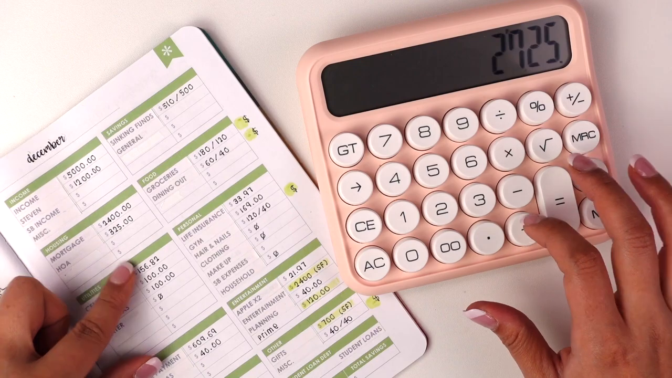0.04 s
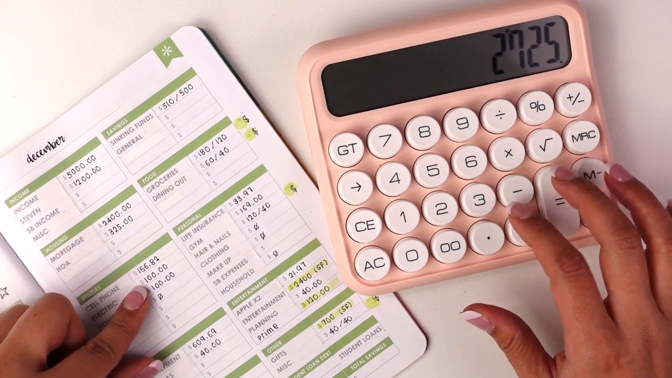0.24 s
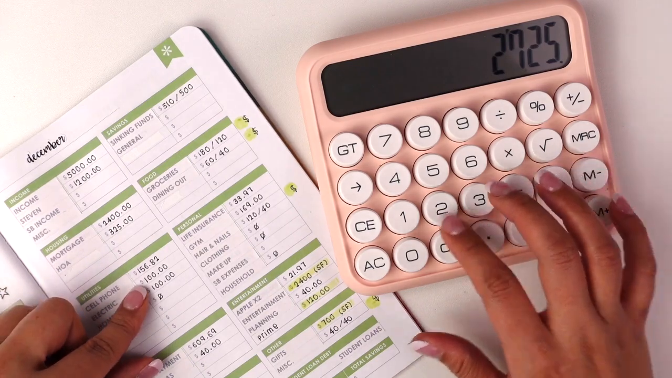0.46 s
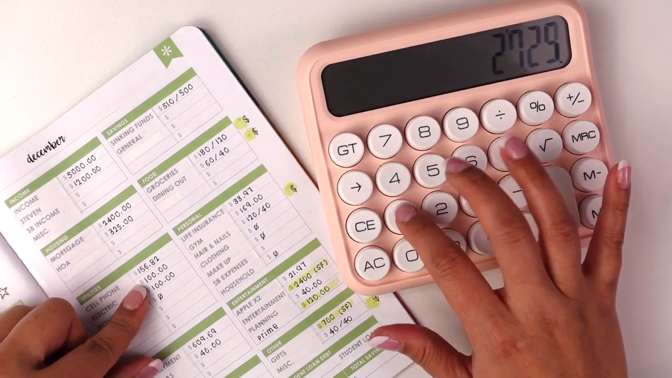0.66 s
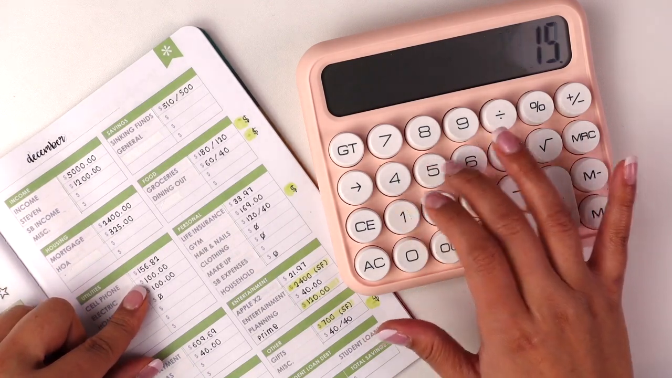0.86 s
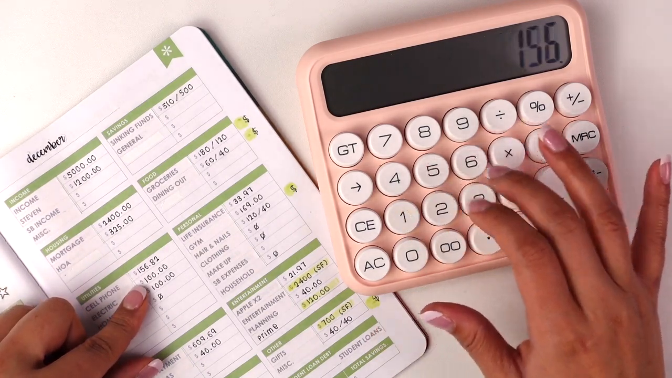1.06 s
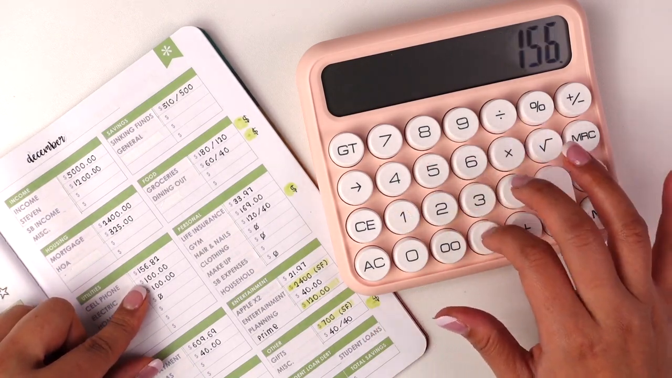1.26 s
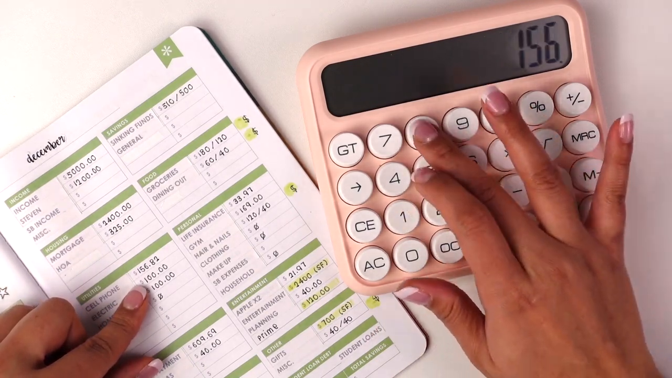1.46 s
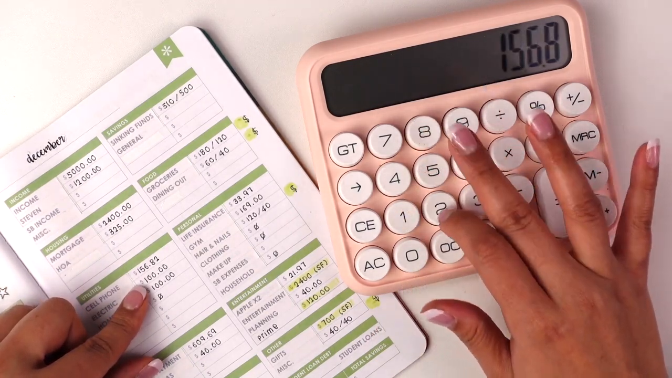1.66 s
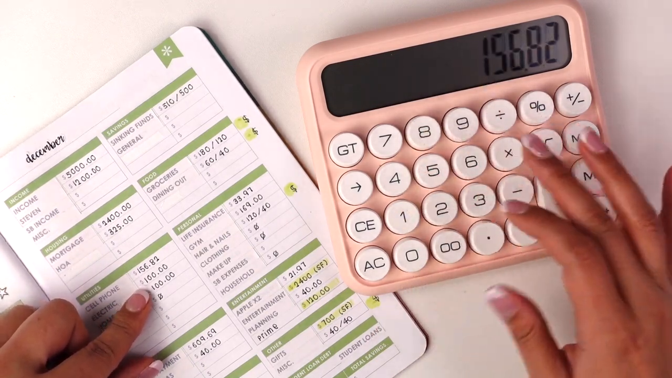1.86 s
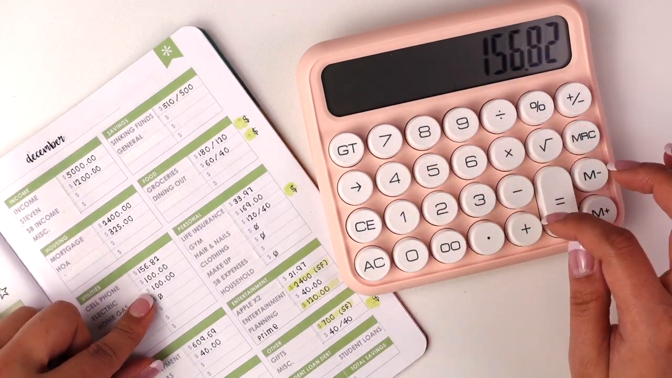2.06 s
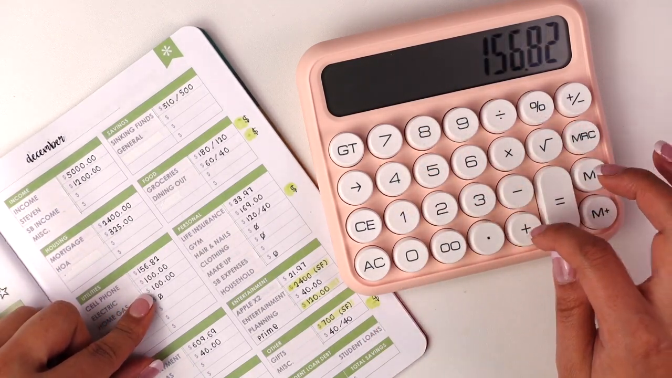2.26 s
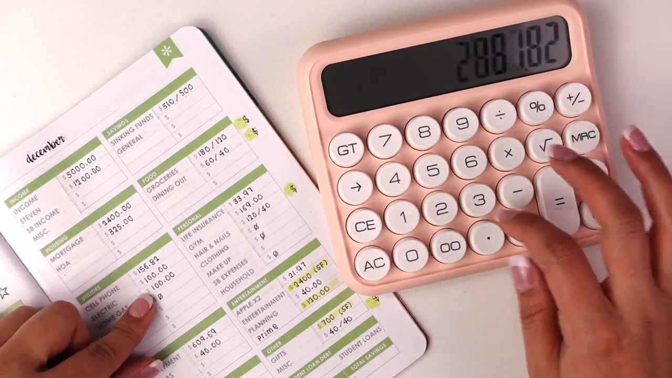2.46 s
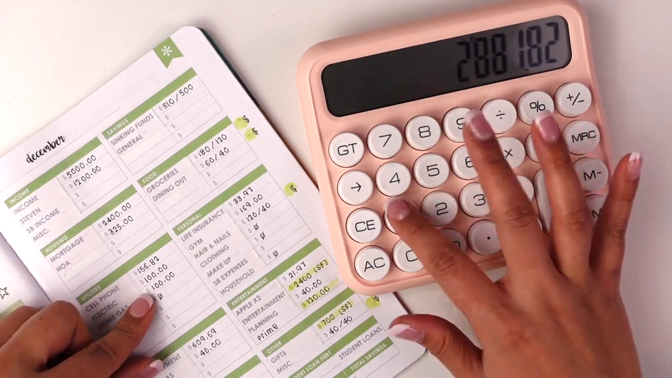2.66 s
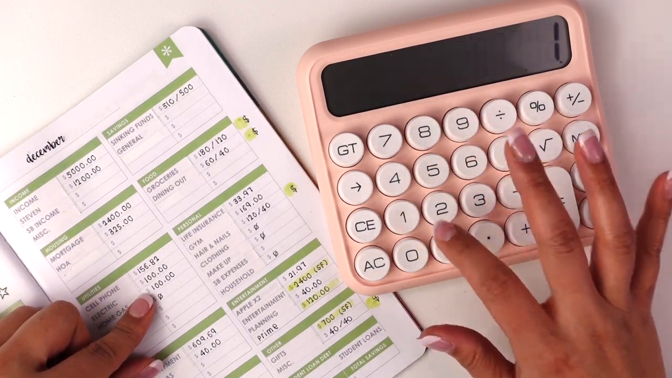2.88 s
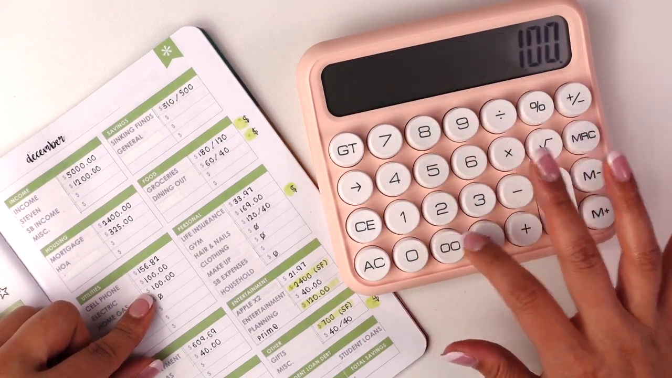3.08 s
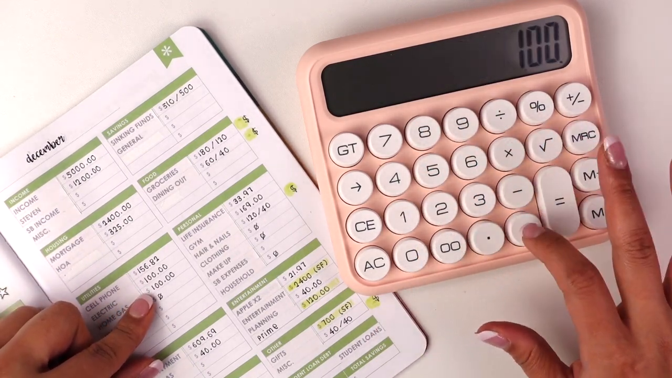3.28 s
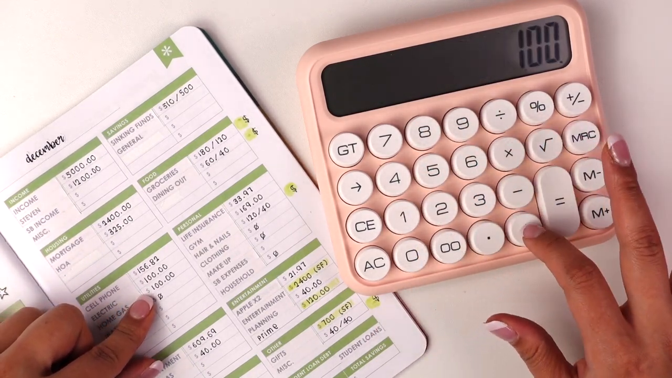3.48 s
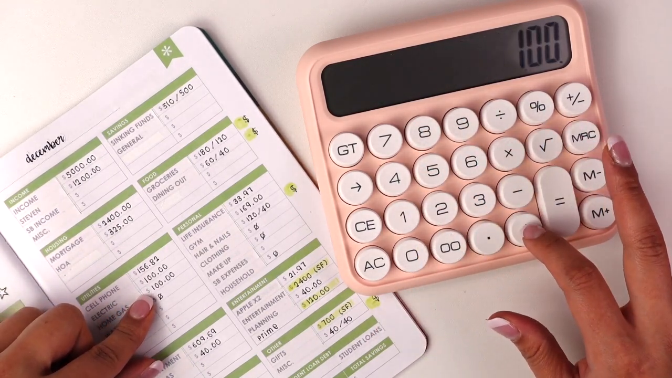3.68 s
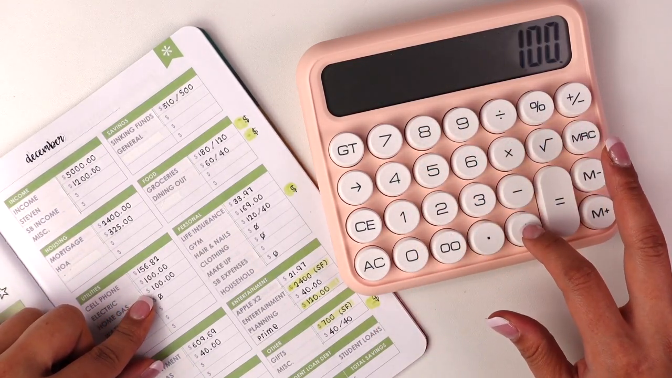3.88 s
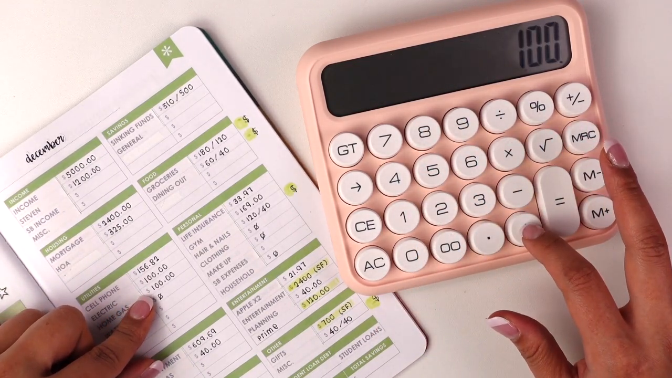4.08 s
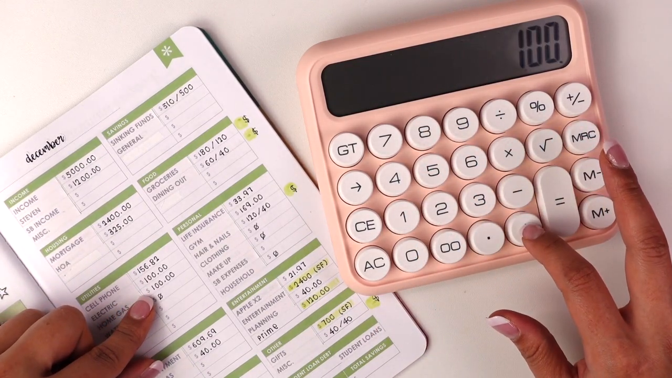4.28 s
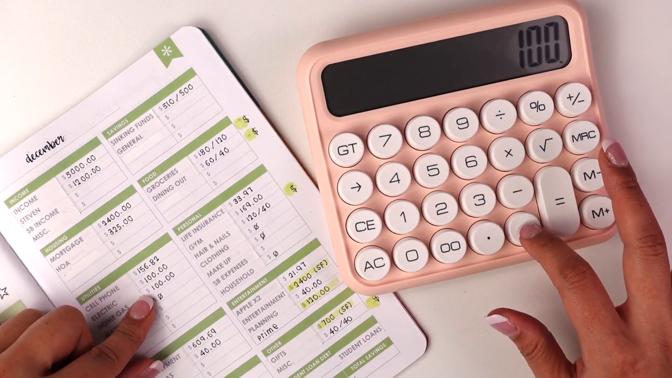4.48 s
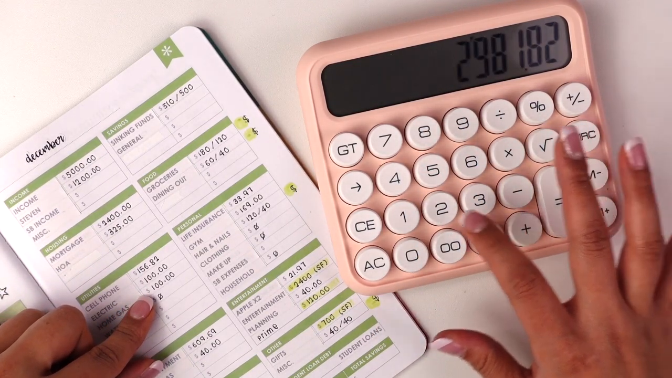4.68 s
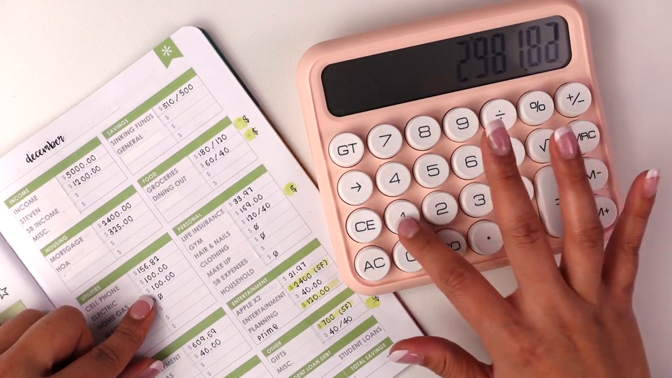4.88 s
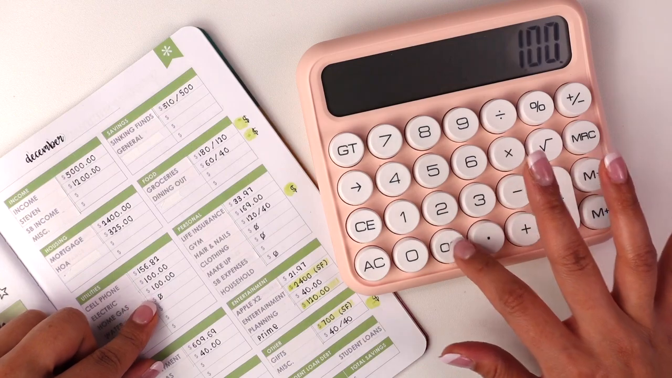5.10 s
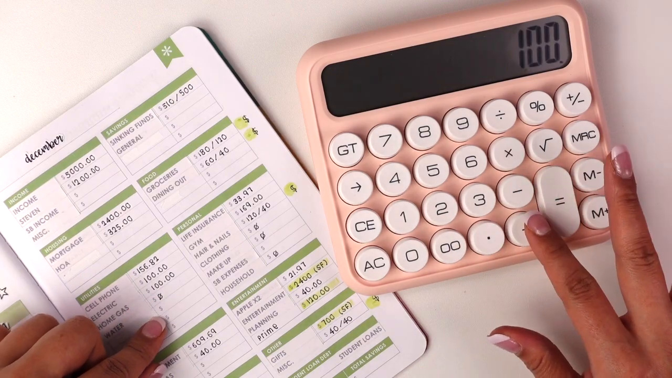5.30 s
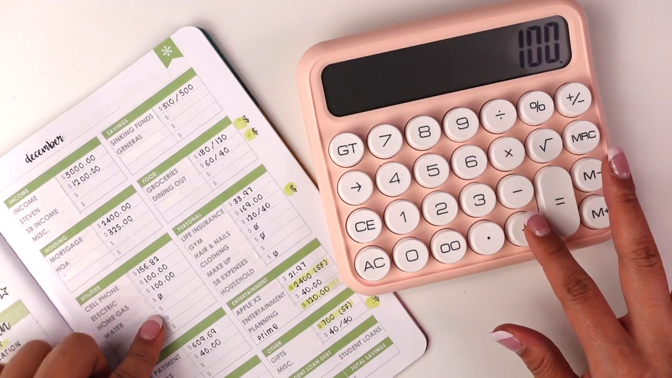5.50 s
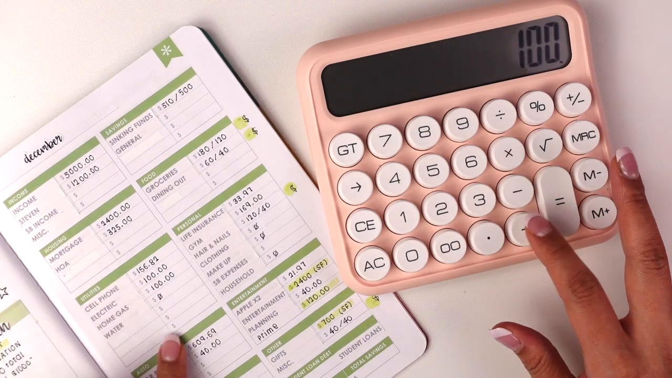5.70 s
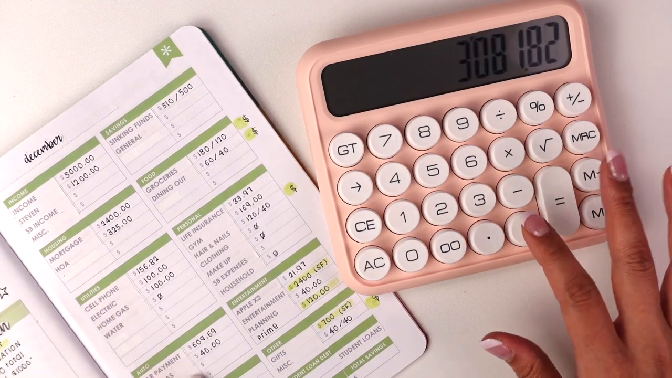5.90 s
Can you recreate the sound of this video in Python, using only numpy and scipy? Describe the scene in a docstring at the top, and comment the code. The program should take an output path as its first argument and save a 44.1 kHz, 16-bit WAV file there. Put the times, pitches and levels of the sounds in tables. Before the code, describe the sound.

A close, nearly mono microphone picks up a plastic calculator being used on a table in a small, quiet room with steady, faint air noise. A key springs back with a bright clack at once, while a hand slides softly on paper until about 0.4 s. From 0.6 to 1.8 s keys come in a quick uneven run: crisp nail ticks, rounder finger-pad clicks, dull low thuds, and louder chattery releases near 1.1, 1.3 and 1.8 s. A press at 2.35 is released at 2.5; another flurry runs from 2.7 to 3.1 s, with a very faint click at 3.4. A pause of about a second follows. Tapping resumes at 4.5 s, with clacks near 4.65 and 5.2 and fast presses between. From 5.4 s the hand rubs the page with small snags, growing louder, before a soft press at 5.8 and a final sharp clack at 5.9 s.

```python
"""Fingers enter sums on a plastic desk calculator on a table in a small, quiet room.
Each key contact mixes a tick, cap chatter, buzz and a ringing case; springing back gives a louder clack.
Pressed keys bottom out with a soft thud: a dull case knock over a rocking table top.
Short noise scuffs give brushes on the keys, a bounce click and a faint swell before each release; the other
hand slides over paper (uneven noise, a few snags) at the start and near the end; room air is steady noise."""
import sys
import numpy as np
from scipy import signal
from scipy.fft import rfft, irfft, next_fast_len
from scipy.io import wavfile
from scipy.ndimage import uniform_filter1d

SR = 44100
rng = np.random.default_rng(int(sys.argv[2]) if len(sys.argv) > 2 else 0)


def wav_out(sig):
    """Save sig, one row per channel (or a flat mono array), as 16-bit PCM at SR to the path in sys.argv[1]."""
    wavfile.write(sys.argv[1], SR, np.round(np.clip(np.atleast_2d(sig).T, -1, 1) * 32767).astype(np.int16))


N = 262306

# keys springing back against their stops: [t/s, click level/dB before gain_db,
# case knock level/dB re click, edge level/dB re click, chatter/s before span]
RELEASE_EVENTS = [(0.0443, -22.5, -24, -12.5, .003), (1.072, -22.3, -14, -14.5, .0018),
                  (1.3359, -24, -15.5, -13.5, .003), (1.8014, -25, -14, -9, .0038),
                  (2.4664, -24.7, -25, -11.5, .0034), (3.0988, -21.8, -22.5, -11.5, .0043),
                  (3.4234, -42.5, -14, -13.5, .0054), (4.6522, -26, -22, -15, .0028),
                  (5.1698, -22.5, -21.5, -11, .0052), (5.899, -21.5, -23.5, -12, .0016)]
# release contact colour: [f/Hz, level/dB relative]
RELEASE_SPECTRUM = [(150, -41), (350, -38), (750, -27.5), (1000, -5), (1450, -7.5), (2100, -6),
                    (2700, -1.5), (3800, -5.5), (5200, -8), (7000, -15.5), (10000, -25.5), (12300, -28.5),
                    (15500, -39.5)]


def releases():
    """The freed cap flies up and chatters against its stop."""
    return keys(RELEASE_EVENTS, RELEASE_SPECTRUM, cap_hz=2780, cap_width=.08, cap_db=3.5, gain_db=0.74,
                tick_db=-9, rebound_db=1.5, rise=.5, span=1.294, buzz_db=-10, buzz_t60_s=0.11,
                ring_db=-12, wet_db=-12.5, early_db=-14.5)


# keys struck by a fingernail: [t/s, click level/dB before gain_db, case knock level/dB re click,
# edge level/dB re click, chatter/s before span, thud level/dB, bottoming knock level/dB before doubling]
NAIL_EVENTS = [(0.6349, -38.5, -16, 1, .0036, -47.5, -43.5), (0.8008, -31, -10, 1.8, .001, -46, -41.5),
               (0.9894, -28.5, -9.5, -3, .0007, -48, -40), (1.2305, -30, -14, -5, .0022, -50, -50),
               (1.7008, -32, -8, .6, .0041, -49, -55), (2.3533, -36.5, -13.5, -6.3, .0021, -51, -53),
               (2.9968, -29.5, -11.4, 0, .0048, -42, -46.5), (4.87, -43.5, -4.5, -2, .0018, -45, -55),
               (5.0599, -29.5, -17, -.7, .0013, -42.5, -50.5)]
# nail contact colour: [f/Hz, level/dB relative]
NAIL_SPECTRUM = [(150, -37), (350, -19.5), (800, -12.5), (1400, -5.5), (2000, -8), (2800, -3.5),
                 (4800, -3.5), (6000, 0), (7500, -2.5), (8800, -7.5), (12300, -11), (15500, -27.5)]


def nail_taps():
    """A hard nail gives a sharp tick and little chatter."""
    return keys(NAIL_EVENTS, NAIL_SPECTRUM, cap_hz=5900, cap_width=.07, cap_db=6, gain_db=-1.28,
                tick_db=6, rebound_db=-2.5, rise=0.53, span=0.78, buzz_db=3, buzz_t60_s=.026,
                ring_db=-14, wet_db=-13.0, early_db=-15)


# keys pushed home by a finger pad: columns as NAIL_EVENTS
# [t/s, click level/dB, case knock level/dB, edge level/dB, chatter/s, thud level/dB, bottoming knock level/dB]
PAD_EVENTS = [(0.7464, -30, -12.5, -7.5, .0054, -60, -60), (0.8945, -23.5, -9, -10, .0035, -60, -60),
              (1.4995, -36, -12, -6.2, .0073, -50.5, -49.5), (1.5787, -26.5, -1.7, -11.5, .0026, -58, -54),
              (2.7229, -41.5, -11.5, -9, .0056, -54.5, -57.5), (2.8181, -25.5, -11, -4.5, .004, -53.5, -60),
              (4.528, -46, -1.5, -17, .0043, -60, -60), (4.9475, -27, -8, -10, .0027, -58, -58),
              (5.781, -43.5, -12, -13, .015, -50, -49)]
# pad contact colour: [f/Hz, level/dB relative]
PAD_SPECTRUM = [(150, -37), (350, -29), (750, -10), (1150, -2), (1750, -10), (2200, -4.5), (2550, -0.5),
                (4000, -6), (5500, -6), (7000, -14), (10500, -23), (15500, -38)]


def pad_presses():
    """A soft finger drives the key home and rings the case."""
    return keys(PAD_EVENTS, PAD_SPECTRUM, cap_hz=3150, cap_width=.15, cap_db=4, gain_db=-0.62,
                tick_db=-18.5, rebound_db=-4, rise=0.75, span=1.05, buzz_db=-16.5, buzz_t60_s=0.15,
                ring_db=-7, wet_db=-14.5, early_db=-12.5)


def keys(events, colour, cap_hz, cap_width, cap_db, gain_db, tick_db, rebound_db, rise, span,
         buzz_db, buzz_t60_s, ring_db, wet_db, early_db, size=8192):
    """Each contact: a tick and its rebound, the cap chattering in its guide, buzzing caps, the ringing case."""
    out, t = np.zeros((2, N)), np.arange(size) / SR
    tick = unit(1. * (t == 0))
    for s, click_db, knock_db, edge_db, chatter_s, *_ in events:
        u = t / (span * chatter_s)
        rebound_s = .0011 * np.exp(0.19 * rng.standard_normal())
        rebound = np.roll(tick, round(SR * rebound_s))
        chatter = unit(rng.standard_normal(size) * (1 - np.exp(-u / rise)) * np.exp(-u ** 3))
        buzz = unit(rng.standard_normal(size) * (1 - np.exp(-u)) * amp(-60 * t / buzz_t60_s))
        ring = amp(ring_db) * unit(case_ring(t))
        own_hz = cap_hz * np.exp(.02 * rng.standard_normal())  # no two caps are quite alike

        def cap(hz):
            return along(colour, hz) + cap_db / (1 + ((hz / own_hz - 1) / cap_width) ** 2)

        def sound(blow):
            body = unit(coloured(blow, cap)) + ring
            return voiced(body, click_db + gain_db, knock_db, edge_db)

        ticks = amp(tick_db) * (tick - amp(rebound_db) * rebound)
        direct = sound(chatter + ticks + amp(buzz_db) * buzz)
        # the room gathers sound from all directions, so the chatter's spectral notches partly average out
        radiated = sound(tick + .35 * chatter)
        add(out, s, room(direct, radiated, wet_db, early_db))
    return out


def voiced(x, click_db, knock_db, edge_db):
    """Set a blow's level over 20 ms; key place and contact hardness weight its low knock and high edge."""
    power = 2 * abs(rfft(x)) ** 2 / (len(x) * SR * .02)
    hz = np.fft.rfftfreq(len(x), 1 / SR)

    def level_db(lo_hz, hi_hz):
        return 10 * np.log10(power[(hz > lo_hz) & (hz < hi_hz)].sum())

    low_db = knock_db - level_db(350, 1100)
    mid_db = -level_db(1200, 5000)
    high_db = edge_db - level_db(5500, 15000)
    weights = [(900, low_db), (1400, mid_db), (4500, mid_db), (6000, high_db)]
    return coloured(x, lambda f: click_db + along(weights, f))


# mean modes of the hollow case: [f/Hz, level/dB relative, t60/s]
CASE_MODES = [(449, -11.5, 0.087), (525.6, -8.5, 0.049), (615, -22, 0.15), (874.6, 0.5, 0.068),
              (955, -1.5, 0.068), (1166, -13.5, .025), (1435, -7, 0.046), (1840, -4.5, .04),
              (2390, -8.5, 0.099), (2674, -11.5, .05), (2780, -11.5, 0.085), (3364, -5.5, 0.071),
              (3818, -9, 0.063), (4650, -14.5, 0.11), (4873, -19.5, 0.019), (5440, -3.5, .03)]


def case_ring(t):
    """The case rings with mode strengths varied at random from blow to blow."""
    hz, db, t60_s = np.transpose(CASE_MODES)[:, :, None]
    strength, detune, phase = rng.standard_normal((3, len(CASE_MODES), 1))
    db = db + 2 * strength
    hz = hz * (1 + .004 * detune)
    modes = amp(db - 60 * t / t60_s) * np.sin(2 * np.pi * hz * t + np.pi * phase)
    return modes.sum(0) * (1 - np.exp(-t / 0.0018))


# an ordinary push; each dB above it sinks deeper (later thud) and stiffens the rubber feet (higher thud)
USUAL_THUD_DB, TRAVEL_S, THUD_HZ = -48, .0095, 114
SINK_S_PER_DB, STIFFEN_HZ_PER_DB = .0013, 5
LANDING_DB = -54  # the landing finger already jolts the table a little


def thuds(swell_s=0.008, squash_db=-3, landing_s=.004, size=8192):
    """Each key bottoms out on its rubber dome: the case knocks dully, the table top rocks a few cycles."""
    out, t = np.zeros((2, N)), np.arange(size) / SR
    knock_spectrum = [(100, -5), (400, 4.5), (1000, -6), (3000, -6.5), (9000, -22)]
    for s, *_, thud_db, knock_db in NAIL_EVENTS + PAD_EVENTS:
        heavy_db = max(thud_db - USUAL_THUD_DB, 0)
        table = np.sin(2 * np.pi * (THUD_HZ + STIFFEN_HZ_PER_DB * heavy_db) * t)
        squash = unit(rng.standard_normal(size) * swell(t, .004))
        blow = unit(case_ring(t)) + amp(squash_db) * squash
        knock = coloured(blow, lambda hz: along(knock_spectrum, hz))
        rock = amp(thud_db) * swell(t, swell_s) * table
        push = rock + 2 * amp(knock_db) * knock / abs(knock).max()
        add(out, s, amp(LANDING_DB) * swell(t, landing_s) * table)
        bottom_s = s + TRAVEL_S + SINK_S_PER_DB * heavy_db
        add(out, bottom_s, room(push, push, wet_db=-3.5, early_db=-13, wide_db=-3.5))
    # so small a surface radiates little deep bass
    return filtered(out, lambda hz: amp(along([(30, -10), (60, -2), (95, 0)], hz)))


# brushes on the keys, and one short bounce click after the release at 1.072 s:
# [t/s, level/dB, centre f/Hz, swell/s]
SMALL_CONTACTS = [(0.01, -49, 2200, .0065), (0.535, -61, 3330, .04), (1.084, -30, 2700, .0015),
                  (2.709, -51, 3470, .006), (4.388, -56, 2800, .0024), (4.64, -42, 2600, .006),
                  (5.09, -38, 1090, .004), (5.27, -40, 2220, .0022)]
# noise swell before each release click; level re that click before gain_db
PRE_LEAD_S, PRE_DB, PRE_HZ, PRE_SWELL_S = .014, -30, 2800, .007


def small_contacts():
    """Brushes on the caps, one bounce click, and a faint, soft noise swell just before each release click."""
    pre_swells = [(s - PRE_LEAD_S, click_db + PRE_DB, PRE_HZ, PRE_SWELL_S)
                  for s, click_db, *_ in RELEASE_EVENTS]
    return scuffs(SMALL_CONTACTS + pre_swells)


def scuffs(events, size=8192):
    """Short, soft swells of band noise, as of skin and nails grazing plastic or paper."""
    out, t = np.zeros((2, N)), np.arange(size) / SR
    octaves, band_db = [-2, -.4, 0, .4, 1, 2], [-28, -10, 0, -10, -18, -36]
    for s, db, centre_hz, swell_s in events:
        graze = coloured(rng.standard_normal(size),
                         lambda hz: np.interp(np.log2((hz + 1) / centre_hz), octaves, band_db))
        scuff = amp(db) * swell(t, swell_s) * unit(graze)
        add(out, s, room(scuff, scuff, wet_db=-6, early_db=-15.5))
    return out


# the other hand on the page, one curve per slide: [t/s, level/dB before grain and catch]
SLIDE_CURVES = [
    [(0, -60), (0.12, -54), (0.4, -73)],
    [(5.36, -73.5), (5.53, -62.5), (5.64, -56), (5.88, -49), (5.95, -39.5)],
]
# page noise: [f/Hz, level/dB per Hz, relative]
PAPER_SPECTRUM = [(700, -21.5), (1400, -6.5), (1900, -0.5), (2400, -9.5), (3200, -4.5), (4500, -7.5),
                  (6500, -9), (10000, -16), (16000, -26)]


def paper(grain_db=2.1):
    """A finger slides over the page, catching unevenly on its fibres."""
    t = np.arange(N) / SR
    level = sum(amp(np.interp(t, *np.transpose(slide), left=-120, right=-120)) for slide in SLIDE_CURVES)
    grain = unit(uniform_filter1d(rng.standard_normal(N), size=200))
    catch_db = 1.3 * unit(uniform_filter1d(rng.standard_normal(N), size=900))
    return level * amp(grain_db * grain + catch_db) * noise(PAPER_SPECTRUM)


# the sliding skin sticks and slips; spacing and level are means
SNAG_FROM_S, SNAG_EVERY_S, SNAG_DB, SNAG_HZ, SNAG_SWELL_S = 5.465, .065, -53.5, 3000, .005


def snags(count=4):
    """The sliding finger snags on the page at uneven intervals."""
    events = []
    for k, (late, hard) in enumerate(rng.standard_normal((count, 2))):
        s = SNAG_FROM_S + SNAG_EVERY_S * (k + .2 * late)
        events.append((s, SNAG_DB + 2 * hard, SNAG_HZ, SNAG_SWELL_S))
    return scuffs(events)


# room tail decay: [f/Hz, t60/s]
TAIL_T60 = [(150, 1.06), (1000, 0.69), (3000, 0.4544), (6000, 0.5554), (14000, 0.35)]
# room tail colour: [f/Hz, level/dB relative]
TAIL_SPECTRUM = [(150, -4), (700, -0.5), (950, -3.5), (1400, -2), (3000, -3.5), (7000, -4.5), (14000, 1.5)]


def room(direct, radiated, wet_db, early_db, wide_db=-9.5):
    """A close, nearly mono microphone hears the direct sound, near reflections and a diffuse tail."""
    hz, t, z = signal.stft(rng.standard_normal((2, SR // 2)), SR, nperseg=256)
    decay_db = along(TAIL_SPECTRUM, hz)[:, None] - 60 * t / along(TAIL_T60, hz)[:, None]
    tail = signal.istft(z * amp(decay_db), SR, nperseg=256)[1]
    t = np.arange(tail.shape[1]) / SR
    tail = tail * (1 - np.exp(-(t / 0.0039) ** 2))
    early = rng.standard_normal(tail.shape) * np.exp(-((t - .012) / 0.009) ** 2)
    answer = amp(wet_db) * tail / np.linalg.norm(tail[0])
    answer = answer + amp(early_db) * early / np.linalg.norm(early[0])
    mid, side = signal.fftconvolve(radiated[None], answer, axes=1) * amp([[0], [wide_db]])
    add(mid, 0, direct)
    return np.array([mid + side, mid - side])


# room air, mid channel: [f/Hz, level/dB per Hz, relative]
AIR_MID_SPECTRUM = [(22, -44), (38, -21), (50, -24.5), (80, -5), (120, -2.5), (200, 3), (310, -1.5),
                    (500, -5), (700, -5), (850, 2), (1000, -9), (1900, -7.5), (2700, -15), (5000, -20),
                    (9500, -20), (16000, -26.5)]
# room air, side channel: [f/Hz, level/dB per Hz, relative]
AIR_SIDE_SPECTRUM = [(22, -31.5), (50, -20), (120, -18.5), (280, -37), (900, 8.5), (3000, -1),
                     (15000, -39.5)]


def room_air(mid_db=-61.2, side_db=-73):
    """Steady moving air, widest from about 1 to 3 kHz."""
    mid, side = amp(mid_db) * noise(AIR_MID_SPECTRUM), amp(side_db) * noise(AIR_SIDE_SPECTRUM)
    return np.array([mid + side, mid - side])


def amp(db):
    """Decibels to gain."""
    return 10 ** (np.asarray(db) / 20)


def unit(x):
    """x at rms 1."""
    return x / np.sqrt(np.mean(x ** 2) + 1e-20)


def along(points, hz):
    """(Hz, value) points read on a log frequency axis."""
    f, v = np.transpose(points)
    return np.interp(np.log(hz + 1), np.log(f + 1), v)


def swell(t, top_s):
    """A soft push that peaks at 1 after top_s."""
    return (t / top_s) ** 2 * np.exp(2 * (1 - t / top_s))


def coloured(x, colour):
    """A short sound through a causal (minimum-phase) filter; colour gives dB at each frequency."""
    c = irfft(np.log(amp(colour(np.fft.rfftfreq(len(x), 1 / SR)))))  # cepstrum, folded to positive time
    c[1:len(c) // 2] *= 2
    c[len(c) // 2 + 1:] = 0
    return irfft(rfft(x) * np.exp(rfft(c)))


def filtered(x, response):
    """x times a response of frequency."""
    m = next_fast_len(N + SR // 2)
    return irfft(rfft(x, m) * response(np.fft.rfftfreq(m, 1 / SR)), m)[..., :N]


def noise(spectrum):
    """Coloured noise of rms 1."""
    return unit(filtered(rng.standard_normal(N), lambda hz: amp(along(spectrum, hz))))


def add(track, s, sound):
    """Mix a sound into the track at time s."""
    part = track[..., max(round(s * SR), 0):][..., :sound.shape[-1]]
    part += sound[..., :part.shape[-1]]


def scene():
    """Keys, table, page and room air."""
    contacts = releases() + nail_taps() + pad_presses()
    return contacts + thuds() + small_contacts() + paper() + snags() + room_air()


TOP_HZ = 16000


def record(dry):
    """The recorder keeps nothing above its band limit."""
    return filtered(dry, lambda hz: hz < TOP_HZ)


dry = scene()
out = record(dry)
wav_out(out)
```